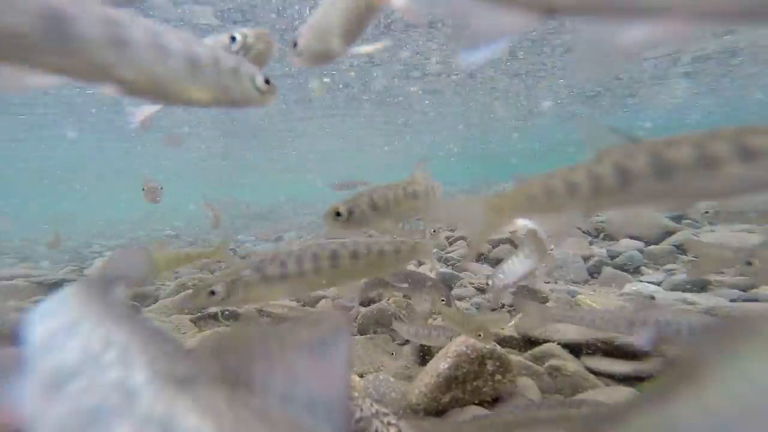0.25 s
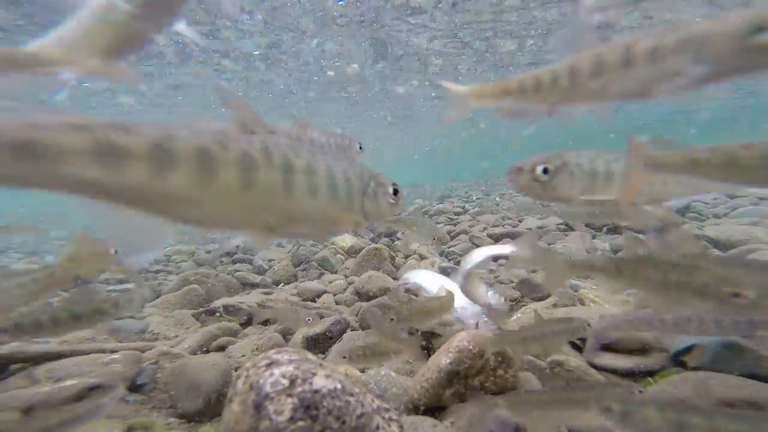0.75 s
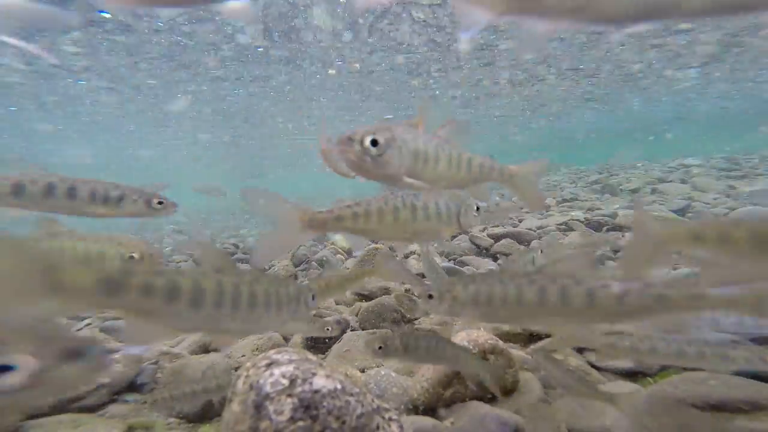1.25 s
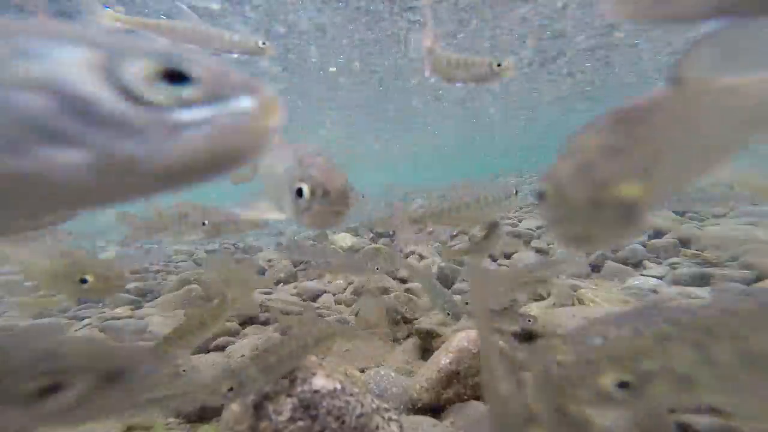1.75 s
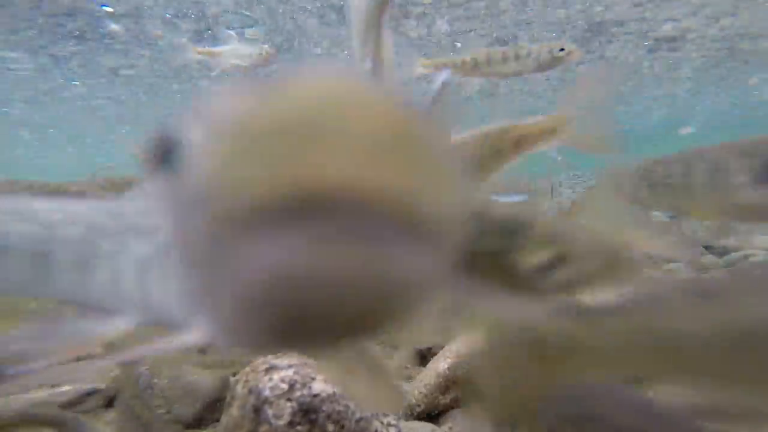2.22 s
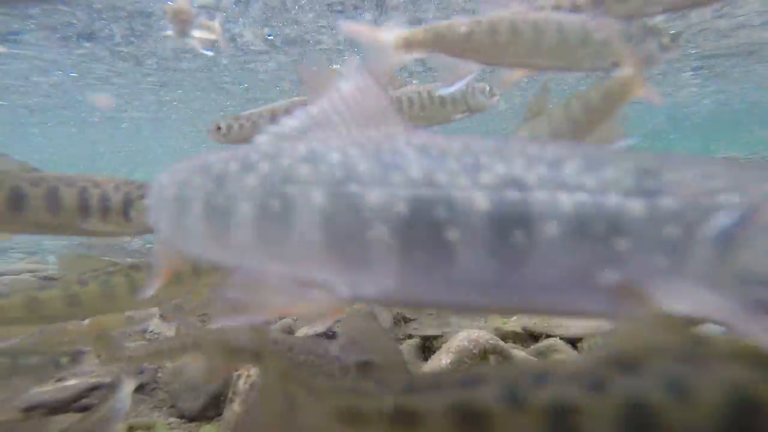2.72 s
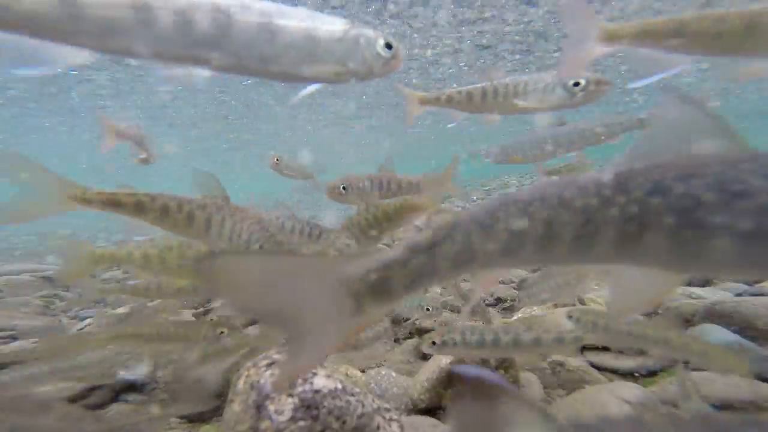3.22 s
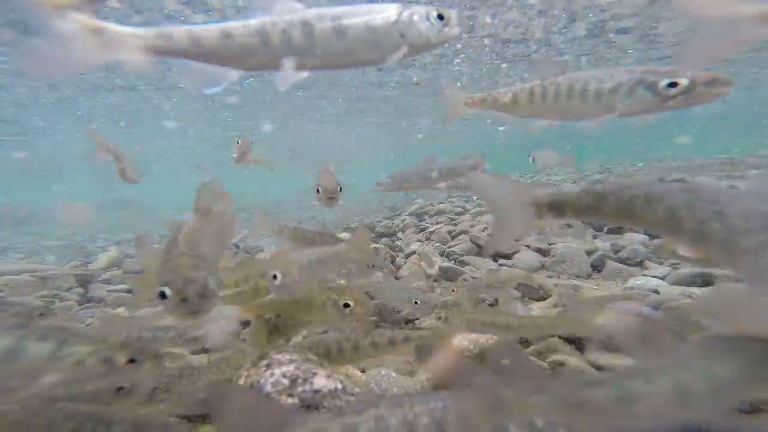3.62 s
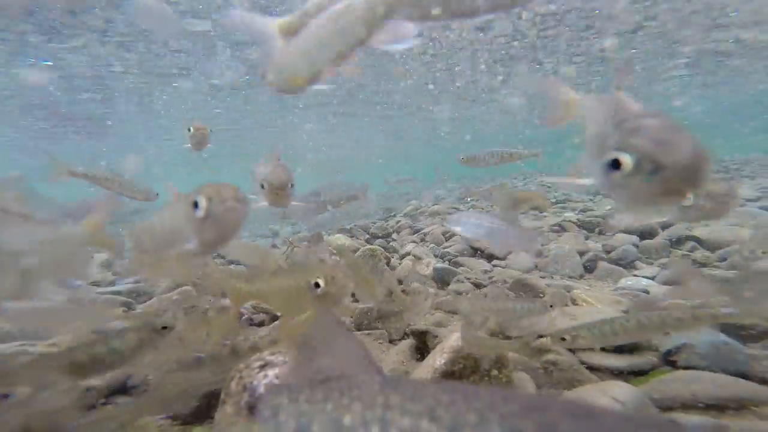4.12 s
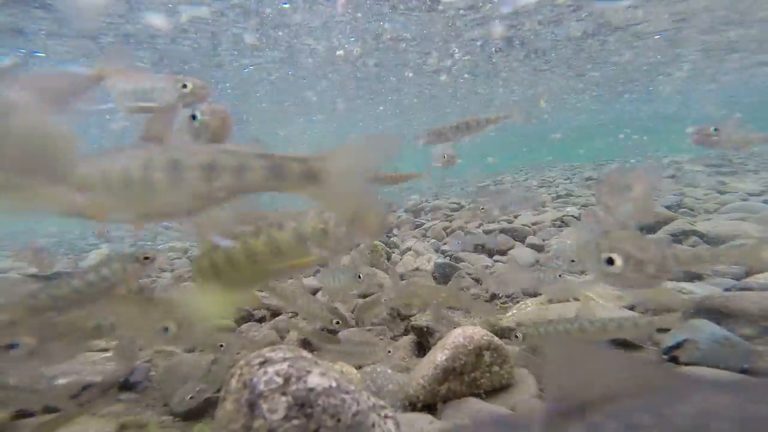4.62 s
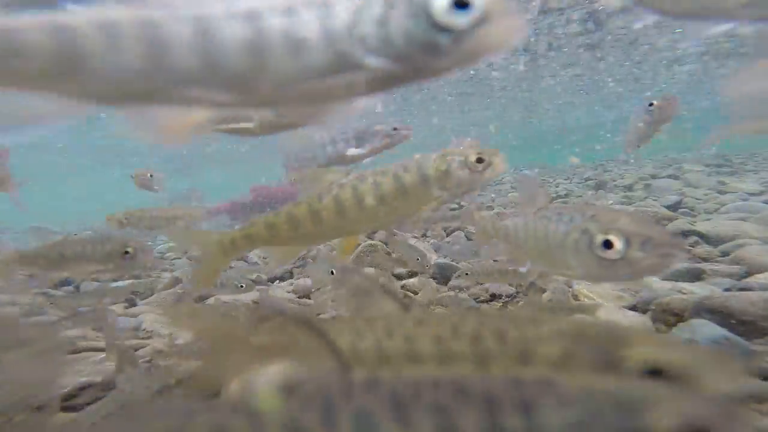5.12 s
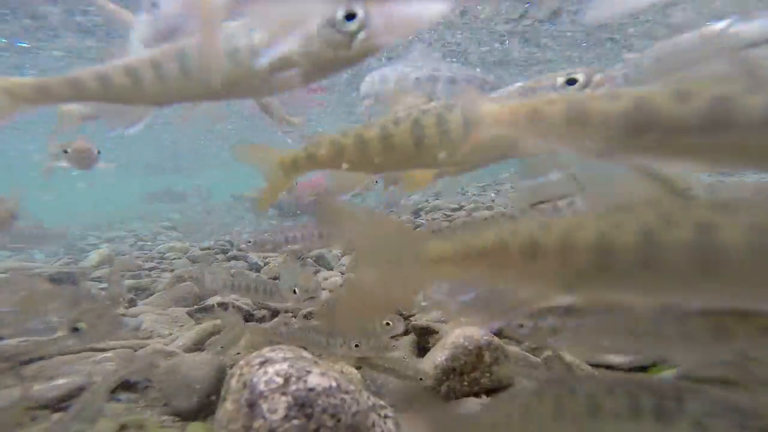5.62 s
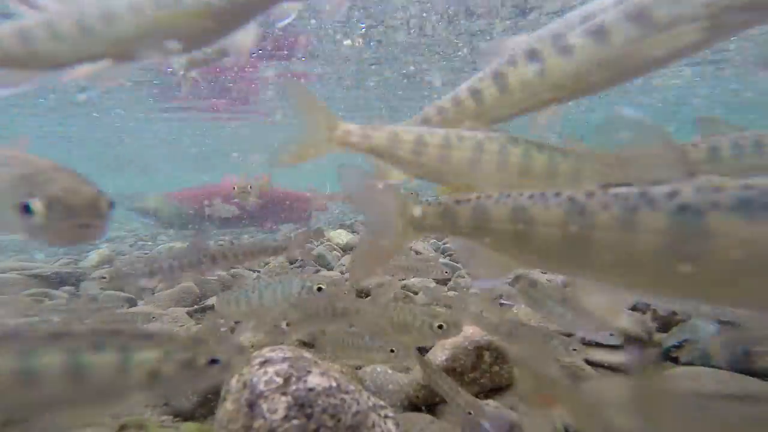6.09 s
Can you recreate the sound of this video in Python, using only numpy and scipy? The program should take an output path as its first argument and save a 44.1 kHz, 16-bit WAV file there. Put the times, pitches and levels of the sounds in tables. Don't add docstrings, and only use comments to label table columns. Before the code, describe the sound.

Underwater on a gravel river bed, fish thump and scrape a sealed camera housing in abrupt clusters, with faint hiss and electronic ticks between.

```python
import sys
import numpy as np
from scipy import signal
from scipy.fft import rfft, irfft
from scipy.io import wavfile
from scipy.ndimage import uniform_filter1d

SR = 44100
rng = np.random.default_rng(int(sys.argv[2]) if len(sys.argv) > 2 else 0)


def wav_record(signal):
    frames = np.transpose(np.atleast_2d(signal))
    bounded = np.clip(frames, -1, 1)
    quanta = np.round(bounded * 32767).astype(np.int16)
    wavfile.write(sys.argv[1], SR, quanta)


def decibels_to_gain(level_db):
    exponent = np.asarray(level_db, float) / 20
    return 10 ** exponent


N = 280026

# pitch_hz, width_hz, level_db
SHELL_DULL = [(501, 260, -3.5), (807, 190, 1)]
SHELL_DEEP = [(1030, 320, -3), (1237, 220, 4), (1630, 260, -1.5)]
SHELL_MID = [(1944, 256, 4.5), (2480, 164.5, -2.5), (3120, 1140, 4.5)]


def add(out, s, wave):
    i = int(s * SR)
    out[i:i + len(wave)] += wave[:N - i]


def coloured(points):
    hz, db = np.transpose(points)
    f = np.arange(N // 2 + 1) * SR / N + 1
    gain = decibels_to_gain(np.interp(np.log(f), np.log(hz), db))
    y = irfft(rfft(rng.standard_normal(N)) * gain, N)
    return y / np.std(y)


def panels(modes, spot=0):
    t = np.arange(1024) / SR * 2 ** (np.clip(spot, -6, 6) / 12)
    ring = np.zeros(1024)
    for k, (hz, width, db) in enumerate(modes):
        decay = np.exp(-np.pi * width * t)
        soft_start = 1 - np.exp(-t * hz * 1.86)
        ring += (-1) ** k * decibels_to_gain(db) * np.sqrt(width) * decay * np.sin(2 * np.pi * hz * t) * soft_start
    return ring / np.sqrt(np.sum(ring ** 2))


def rings(x, modes, spot=0):
    return signal.fftconvolve(x, panels(modes, spot))[:N]


def thump(hz, cycles, rise=0.15):
    cycles = max(cycles, .15)
    c = np.arange(int(min(7 * cycles / hz, .6) * SR)) / SR * hz
    turns = c + .25 * (1 - np.exp(-2 * c))
    swing = -np.sin(2 * np.pi * turns) * np.exp(-c / cycles) * (1 - np.exp(-c / rise))
    swing *= np.minimum(3 * (1 - c / c[-1]), 1)
    return swing / np.abs(swing).max()


def rock():
    return thump(35 * (1 + 0.11 * rng.uniform(-0.79, 1)), 2.4, rise=0.85)


def hiss():
    # pitch_hz, level_db
    hiss_colour = [(20, -7), (60, -5), (200, -7.5), (500, -11), (1200, -16), (4000, -23.5), (9400, -33),
                   (14700, -40.5)]
    return decibels_to_gain(-58) * coloured(hiss_colour)


def whines():
    # pitch_hz, level_db
    whine_tones = [(2930, -81), (5845, -77.5), (8781, -83), (11718, -83), (14625, -82)]
    time = np.arange(N) / SR
    out = np.zeros(N)
    for hz, db in whine_tones:
        drift = np.cumsum(rng.standard_normal(N)) * .009
        out += decibels_to_gain(db + 3.5) * np.sin(2 * np.pi * hz * time + drift)
    return out


def memory_card():
    # start_s, end_s, level_db
    long_writes = [
        (0, 0.228, -68),
        (1.966, 2.25, -69),
        (4.201, 4.506, -68.5),
        (4.547, 4.641, -75),
    ]
    # start_s, blocks
    short_writes = [(.5893, 1), (.6826, 1), (.7235, 1), (.8212, 1), (1.0821, 1), (1.2338, 2), (1.372, 1),
                    (1.5551, 1), (1.814, 2), (1.9437, 1), (2.8856, 1), (3.0019, 1), (3.2488, 2),
                    (3.4035, 1), (3.4269, 2), (3.5322, 2), (3.6604, 1), (3.7527, 2), (4.6059, 1),
                    (4.6812, 1), (4.8944, 1), (5.0035, 2), (5.187, 1), (5.3044, 2), (5.4943, 1), (5.662, 1),
                    (5.7842, 1), (5.9069, 1), (5.9314, 1), (6.28, 2)]
    # start_s, end_s, level_db
    closing_buzz = [
        (.232, 0.277, -67),
        (4.51, 4.558, -67),
    ]
    # pitch_hz, width_hz, level_db
    card_colour = [(6860, 520, 7.5), (10240, 430, 5.5), (13000, 1200, 0)]
    time = np.arange(N) / SR
    draw, buzz = np.zeros((2, N))
    frame_s, pulse_s, block_gap_s, buzz_hz = .0333, .0055, .0125, 798
    in_frame = time % frame_s
    blocks = (in_frame % pulse_s < .003) * (in_frame < .026)
    for start, end, db in long_writes:
        draw += decibels_to_gain(db) * blocks * (time > start) * (time < end)
    for s, count in short_writes:
        for k in range(count):
            add(draw, s + k * block_gap_s, np.full(int(0.0025 * SR), decibels_to_gain(-66.5)))
    spikes = np.diff(np.floor(time * buzz_hz), append=0) > 0
    for start, end, db in closing_buzz:
        buzz += decibels_to_gain(db) * np.sqrt(SR / buzz_hz) * spikes * (time > start) * (time < end)
    crackle = draw * np.sign(rng.standard_normal(N))
    return rings(crackle + buzz, card_colour)


def circuit():
    top = signal.ellip(10, .3, 45, 14950, fs=SR, output="sos")
    return signal.sosfilt(top, hiss() + whines() + memory_card())


def current():
    # time_s, level_db
    flow = [(0, -84), (.17, -50), (.32, -43), (.55, -43.5), (.7, -64), (.83, -56), (.97, -80), (1.3, -57.5),
            (1.66, -81), (2.16, -54), (2.4, -51), (2.71, -44.5), (2.87, -70), (3.55, -78.5), (4.15, -53.5),
            (4.36, -48.5), (4.701, -71), (6.35, -63)]
    s, db = np.transpose(flow)
    push = decibels_to_gain(np.interp(np.arange(N) / SR, s, db - 2.0))
    return push * coloured([(15, -27.5), (30, 1.5), (60, -5.5), (150, -21.0), (400, -65.0)])


def shoves():
    # start_s, level_db, pitch_hz, rocking against the shove in db
    shove_table = [ (.143, -44, 63, 2.5), (.364, -23, 58.3, -25.5), (.422, -32.5, 69, -26),
                   (.571, -43, 60, -6), (1.383, -32, 57.5, -13), (1.4008, -35.5, 57.6, -12),
                   (2.135, -36, 66, -14), (2.2789, -12.5, 94, -27), (2.348, -23, 75.5, -34),
                   (2.425, -25.5, 65, -35), (2.493, -35.5, 55.9, -13), (2.765, -44, 45.2, -19),
                   (3.774, -42.5, 67, -13.5), (4.048, -14.5, 53.7, -22.5), (4.095, -26, 70.4, -30),
                   (4.178, -25.5, 55, -17), (4.215, -33, 53.7, -5), (4.235, -40, 69, -4),
                   (4.343, -40, 45, 2), (.165, -32, 46, -13.5), (.535, -34, 46, -5.5),
                   (2.733, -40, 70, -13)]
    out = np.zeros(N)
    for s, db, hz, rock_db in shove_table:
        add(out, s, decibels_to_gain(db) * thump(hz, 0.55))
        add(out, s, decibels_to_gain(db + rock_db) * rock())
    return out


def bounces():
    # start_s, level_db, pitch_hz, decay in cycles
    bounce_table = [(.143, -35.5, 280, 0.2), (.528, -27, 190, 0.46), (0.533, -29, 159, 0.25),
                    (1.383, -31, 90, .22), (1.3885, -33, 84.6, .45), (1.9782, -24.5, 255, 0.27),
                    (0.3098, -17, 210, .22), (2.269, -16.5, 210, 0.22), (2.7275, -42, 120, 0.24),
                    (2.4925, -36, 119, .4), (4.628, -49.5, 45, .6), (2.2926, -21, 200, 0.43),
                    (2.755, -42, 90, .3), (4.044, -15, 115, 0.25), (4.069, -12, 70, 0.19),
                    (4.296, -30, 80.7, .22)]
    out = np.zeros(N)
    for s, db, hz, cycles in bounce_table:
        add(out, s, decibels_to_gain(db) * thump(hz, cycles))
    return out


def strokes():
    # contact_s, hold_s, level_db, brightness_db, sand against the rub in db
    stroke_table = [(0.317, 0.0056, -39, 5, -8), (0.327, 0.021, -39.5, -6, -21),
                    (0.35, 0.01, -38.5, -3, -18), (.376, 0.035, -44.5, -6, -17), (0.42, 0.045, -50, 0, -11),
                    (0.464, 0.016, -39.5, -3, -10), (0.492, 0.046, -49, -2.5, -9.5),
                    (1.382, 0.0043, -48, -8, -19), (1.981, 0.011, -57, -2, -8),
                    (2.277, 0.0038, -31.5, -11, -14), (2.294, 0.016, -32, -4.5, -17.5),
                    (2.325, 0.021, -39.5, -6.5, -20), (2.383, 0.04, -54.5, -5, -24),
                    (2.425, 0.061, -51.5, -2.5, -17), (2.505, 0.042, -58.5, -6, -24),
                    (2.628, 0.0064, -52.5, 2, -15), (2.676, 0.044, -52.5, -2, -12),
                    (2.724, 0.013, -41.5, -2, -10.5), (4.017, 0.013, -34, -3, -10.5),
                    (4.035, 0.013, -28.5, -7.5, -17.5), (4.052, 0.019, -29, -8.5, -15.5),
                    (4.086, 0.064, -50.5, -6, -22), (4.165, 0.043, -45.5, -5.5, -22),
                    (4.205, 0.071, -42, -5, -13.5), (4.302, 0.014, -40, 1.5, -8.5),
                    (4.312, 0.013, -44.5, -6, -11)]
    s, hold, db, bright_db, sand_db = np.transpose(stroke_table)
    t = np.arange(0, N / SR + 1, .001)[:, None] - s
    press_db_per_s, lift_db_per_s = 1793.5, 903
    press = db + press_db_per_s * np.minimum(t, 0) - lift_db_per_s * np.maximum(t - hold, 0)
    k = press.argmax(axis=1)
    top = np.maximum(press.max(axis=1), -120)
    ms = np.arange(N) / SR * 1000
    return [np.interp(ms, np.arange(len(k)), v) for v in (top, bright_db[k], top + sand_db[k])]


def grit(per_s, spread_db):
    size = decibels_to_gain(spread_db * np.minimum(rng.exponential(size=N), 4))
    grains = rng.standard_normal(N) * (rng.random(N) < per_s / SR) * size
    return grains / np.std(grains)


def loose_stones(rub_db, bright_db):
    when, size, edge, soft = rng.random((2000, 4)).T
    per_s = 40
    s = np.cumsum((.3 - np.log(when)) / per_s / 1.3)
    i = np.minimum(s * SR, N - 1).astype(int)
    db = rub_db[i] - 7.5 + 12 * (size - .5)
    edge_db = -22 + 14 * (edge - .5)
    spot = 4.5 * (when - .5)
    stones = np.c_[s, db, bright_db[i] - 3, edge_db, spot, .6 * soft]
    return stones[(s < N / SR) & (rub_db[i] > -70)]


def contacts(rub_db, bright_db):
    # start_s, level_db, brightness_db, edge_db, spot in semitones
    nudge_table = [
        (.1427, -37.5, -30, -44, -0.5),
        (.2527, -40, -23, -40, 1.6),
        (.2862, -38, -20, -36, .3),
        (0.3003, -39, -26, -44, -1.5),
    ]
    tap_table = [(.3136, -23, -9, -25.5, .6), (0.3382, -31, -4, -5, -0.48), (.3445, -24, -3.5, -26, 0.42),
                 (1.9792, -27.5, -8.5, -13, -0.98), (2.2695, -13.5, -15, -40, -.6),
                 (2.2785, -26, -14, -23, 1.1), (2.2997, -19.5, -12, -15, .6), (2.3193, -48, -.5, -30, .6),
                 (4.02, -17.5, -11.5, -14, -1.3), (4.03, -18, -16, -27, -.6), (4.0443, -25, -11, -10, 0.33),
                 (4.0574, -3, -22, -40, -.6), (4.0976, -37.5, 2, -12, .6), (4.174, -36.5, 0, -6, -0.33),
                 (4.2077, -30, -25, -29, 0.98), (4.2137, -28, -19, -17, -0.45),
                 (4.231, -29, -10, -14, 0.46), (4.274, -35, 1.5, -8, -0.15), (4.3065, -36, -8, -22, 0.73),
                 (4.0532, -13.5, -21, -32, 1.1), (4.0618, -16, -24, -30, .6), (2.2658, -38, -13, -35, .6)]
    tick_table = [(0.3115, -22, -21, -31, 0.36), (0.3198, -18, -1.6, -16, 0.34), (0.364, -27, -3, -19, .6),
                  (0.4038, -19, -1, -17.5, 1.2), (0.421, -28, -9, -17, -.6), (.4385, -37, 4, -17, 1.7),
                  (0.449, -26.5, -0.5, -14, 1.5), (0.4599, -30, -2, -29, 0.73),
                  (0.4676, -10.5, -1.7, -15, 0.56), (0.4786, -30, -2, -25, 0.46),
                  (.483, -30, -2, -6.5, 0.78), (0.511, -32.5, -11, -12, 0.81),
                  (0.5276, -25.5, -1.5, -14, 0.99), (1.3737, -36, -11, -31, 1), (1.3818, -28, -8, -12, 1.5),
                  (1.385, -30, -21, -42, -1), (1.403, -34.5, -6.5, -15, .6), (2.3485, -34, -8, -2.5, .6),
                  (2.365, -34, -8, -11, .6), (2.4453, -40, -3, -4, 0.87), (2.4616, -26.5, -8, -20, -0.92),
                  (2.471, -27.5, -9, -17.5, 0.42), (2.5191, -32.5, -6, -17, -0.24),
                  (2.5437, -38, -4, -22, 0.4), (2.627, -34, -8, -17, 1.2), (2.632, -32, -12, -14.5, 0.11),
                  (2.679, -37, -8, -27, .6), (2.6855, -39, -2, -16, 0.79), (0.3886, -38, -1.2, -22, 0.83),
                  (.397, -33, -1.5, -16, .6), (.4525, -31, -10, -26, .6), (0.4987, -29.5, -4, -21, 1.7),
                  (0.5237, -36, 0, -4, .6), (0.3227, -28, -2, -18, 0.89), (.26, -46.5, -.5, -30, 0.46)]
    more_tick_table = [(4.0079, -22.5, -14.5, -37, -1.5), (4.071, -27, -7, -4.5, .6), (4.11, -42, -4, -6, .6),
                       (4.1427, -31, -16, -25, -0.47), (4.1495, -31.5, -4, -17, 0.77),
                       (4.1833, -25, -9.5, -14.5, 0.75), (4.219, -30, -9, -16, 0.46),
                       (4.2395, -26, -21, -22, 1.4), (4.2513, -27, -13, -17, .6), (4.2625, -32, -19, -24, 0.47),
                       (4.3144, -26.5, -7, -17, 0.41), (4.2985, -42, -1, -17, 0.47), (4.3115, -29, -3, -7, 0.76),
                       (4.268, -33, -2, -6, 1), (2.2925, -31, -10.5, -15, 1.2), (2.3035, -31.5, 1, -6, 0.26),
                       (2.3095, -29, -9, -18, 1.2), (2.3527, -47, 5, 4, 0.44), (2.274, -23.5, -15, -18, 0.73),
                       (4.0405, -21, -4, -19, .6), (4.0595, -14, -16, -31.5, 0.34), (2.2965, -28, -9, -12, 0.61),
                       (4.1765, -34, -16, -25, -1.5), (4.3165, -27, -19, -28, 0.49), (.4712, -28, -3, -18, .6),
                       (.418, -34, 0, -24, .6), (2.4535, -42, -3, -13, .6), (2.477, -37, -10, -16, 0.72),
                       (2.4105, -46, 0, -14, .6), (2.433, -46, -5, -7, .6), (2.7145, -42, -1, -20, .6),
                       (2.7285, -32, -6, -12, 0.3), (2.734, -33.5, -4, -15, 1.5), (2.739, -32, -10, -18, -0.76),
                       (2.281, -33, -8.5, -3.5, .6), (1.3765, -42, -14, -30, .6), (1.3985, -42, -14, -30, 1.5),
                       (.4125, -36, -3, -18, .6), (.531, -34, -6, -16, .6), (2.4815, -39, -6, -22, 1.5)]
    touches = [(*r, 1) for r in nudge_table]
    touches += [(*r, 0.8) for r in tap_table]
    touches += [(*r, 0.17) for r in tick_table + more_tick_table]
    return touches + list(loose_stones(rub_db, bright_db))


def knocks(rub_db, bright_db):
    struck, crumbs = np.zeros((2, N))
    t = np.arange(400) / SR
    fade = np.exp(-t / 0.0026) * (1 - np.exp(-t * 10000))
    for s, db, bright, edge_db, spot, soft in contacts(rub_db, bright_db):
        crumble = rng.standard_normal(400) * fade
        burst = crumble.copy()
        burst[3] += 14
        burst = decibels_to_gain(db) * 5.4 * burst / np.sqrt(np.sum(burst ** 2))
        low = burst * np.sqrt(max(1 - decibels_to_gain(min(bright, 0)) ** 2, .05))
        soft = np.clip(soft, 0, 1)
        add(struck, s - .001, rings(low * np.sqrt(soft), SHELL_DULL, spot))
        add(struck, s - .001, rings(low * np.sqrt(1 - soft), SHELL_DEEP, spot))
        add(struck, s - .0007, rings(burst * decibels_to_gain(bright), SHELL_MID, spot))
        add(crumbs, s - .0009, crumble * decibels_to_gain(db + edge_db - 5.5))
    return struck, crumbs


def shell():
    # pitch_hz, width_hz, level_db
    high_panels = [(4410, 770, 8.5), (5730, 680, 6), (7100, 680, 2), (8400, 1140, -3), (10300, 620, -1.5),
                   (13690, 1600, -11.5)]
    # pitch_hz, width_hz, level_db
    sand_ring = [(6750, 500, -1.5), (10160, 600, 2.5)]
    rub_db, bright_db, sand_db = strokes()
    struck, crumbs = knocks(rub_db, bright_db)
    rub = decibels_to_gain(rub_db) * grit(5000., 2.7)
    sand = decibels_to_gain(sand_db - 5.0) * grit(8800.0, 3.9)
    rumble = decibels_to_gain(0.5) * rings(rub, [(150, 62, 3.0), (330, 96, -5.5)])
    body = struck + rings(decibels_to_gain(-2.0) * rub, SHELL_DULL) + rings(decibels_to_gain(-1.5) * rub, SHELL_DEEP)
    body += rings(decibels_to_gain(bright_db) * rub, SHELL_MID)
    body = signal.sosfilt(signal.cheby1(6, 1, 3650, fs=SR, output="sos"), body)
    edge = rings(crumbs + sand, high_panels) + decibels_to_gain(-7) * rings(sand, sand_ring)
    edge = signal.sosfilt(signal.cheby1(4, 1, 15000, fs=SR, output="sos"), edge)
    return rumble + body + edge


def recoils():
    # start_s, level_db, pitch_hz, decay in cycles
    recoil_table = [(0.3154, -4, 64.7, .17), (1.3766, -19, 189, 0.2), (2.273, -4.5, 60.2, 0.13),
                    (4.0207, -0.7, 252, 0.26), (4.3049, -13, 260, 0.3), (0.155, -34, 45, 0.2),
                    (0.2036, -30, 374, 0.5), (0.291, -23, 80, 0.68), (.3397, -12.5, 164, 0.25),
                    (0.5234, -23.5, 229, 0.35), (2.7485, -34, 45, 0.28), (4.074, -23, 35, 0.21),
                    (2.661, -44, 200, .3), (1.9832, -17, 122, 0.13), (2.0033, -27.5, 200, .22),
                    (2.7236, -27, 250, 0.43), (2.7307, -29, 150, 0.2), (4.0113, -3.5, 80.6, 0.63),
                    (4.022, -8.5, 230, .22), (4.0642, -13.5, 139, 0.29), (4.2712, -30, 60, .22),
                    (4.322, -24, 40, 0.39), (4.326, -31.5, 300, 1.5)]
    out = np.zeros(N)
    for s, db, hz, cycles in recoil_table:
        add(out, s, -decibels_to_gain(db) * thump(hz, cycles))
    return out


def blows():
    # start_s, level_db, pitch_hz, decay in cycles
    blow_table = [ (0.2048, -31.5, 110, 0.24), (.251, -28.5, 120, 0.63), (0.285, -17.5, 126, 0.21),
                  (0.3122, 0.5, 122, 0.29), (0.3374, -8.5, 150, 0.38), (.403, -39, 150, 1.6),
                  (0.466, -31, 328, 0.56), (0.5253, -21.5, 125, 0.24), (1.38, -27.5, 182, 0.31),
                  (1.981, -10.5, 185, 0.15), (1.988, -26.5, 282, 1.2), (2.001, -30, 190, 0.27),
                  (2.014, -28, 108, 0.42), (2.028, -31, 131, 0.21), (2.128, -39.5, 190, 1.06),
                  (2.2709, 1.5, 138, 0.2), (2.289, -25, 150, .6), (2.304, -25, 393, 2.1),
                  (2.4809, -33, 160, 2.1), (2.7251, -22.5, 115, 0.29), (4.0093, -0.5, 135, 0.14),
                  (4.0239, -6, 190, .2), (4.0271, -17, 230, .6), (4.056, -16, 390, 0.75),
                  (4.067, -15.5, 150, 0.22), (4.2674, -20.5, 90, 0.24), (4.3064, -17.5, 114, 0.61),
                  (4.3167, -13.5, 227, 0.53), (4.3212, -16, 199, 0.17)]
    out = np.zeros(N)
    for s, db, hz, cycles in blow_table:
        add(out, s, decibels_to_gain(db) * thump(hz, cycles))
        add(out, s, decibels_to_gain(min(db - 30, -44)) * rock())
        if db > -5 and hz < 200:
            add(out, s - 0.0019, decibels_to_gain(db - 12) * thump(110., .3))
    return out


def pebbles():
    # start_s, level_db, pitch_hz
    chip_table = [(0.359, -34, 2000), (0.3964, -42, 3270), (0.3969, -40, 1420), (0.4039, -28, 1340),
                  (0.4089, -39, 1380), (0.4168, -40, 2280), (0.4612, -40, 3140), (0.4612, -36, 2090),
                  (0.4772, -37, 1300), (0.4777, -37, 3360), (0.4827, -34, 2540), (2.2163, -43, 470),
                  (2.2791, -27, 1553), (2.2921, -30, 1420), (2.2971, -28, 1770), (2.3305, -33, 860),
                  (2.4447, -42, 3320), (2.4447, -44, 1460), (2.4602, -42, 3140), (2.4752, -42, 1340),
                  (2.4792, -45, 2020), (2.5246, -47, 1380), (2.542, -46, 1290), (2.7266, -42, 3140),
                  (2.7286, -37, 1550), (2.7326, -36, 1430), (4.0207, -30, 1980), (4.0321, -29, 1510),
                  (4.0381, -21, 727), (4.0426, -25, 1510), (4.0516, -21, 690), (4.0695, -26.5, 1610),
                  (4.074, -26.5, 470), (4.1748, -39, 1510), (4.2032, -39, 730), (4.2132, -39, 1890),
                  (4.2202, -35, 1160), (4.2546, -35, 860), (4.2711, -37, 1510), (4.312, -35, 3140)]
    # start_s, level_db, pitch_hz
    more_chip_table = [
        (1.3809, -23, 1600),
        (1.3846, -25, 1170),
        (4.2138, -30, 800),
        (2.461, -40, 560),
        (.4492, -35, 2550),
    ]
    out, t = np.zeros(N), np.arange(500) / SR
    swell_s = .0011
    for s, db, hz in list(chip_table) + list(more_chip_table):
        add(out, s, decibels_to_gain(db) * np.sin(2 * np.pi * hz * t) * t / swell_s * np.exp(1 - t / swell_s))
    return out


def bubbles():
    # start_s, level_db, pitch_hz
    bubble_table = [
        (0.807, -43.5, 456),
        (0.923, -44, 391),
        (1.491, -53.5, 490),
        (1.592, -46, 464),
        (2.791, -45, 496),
    ]
    out = np.zeros(N)
    for s, db, hz in bubble_table:
        add(out, s, decibels_to_gain(db) * thump(hz, 1.6, rise=0.76))
    return out


def lens_rattle():
    # start_s, length_s, level_db
    rattle = (4.0183, 0.00335, -18.5)
    s, length, db = rattle
    band = signal.butter(1, [8000., 14000.], "band", fs=SR)
    chatter = signal.lfilter(*band, rng.standard_normal(600))[:int(length * SR)]
    out = np.zeros(N)
    add(out, s, decibels_to_gain(db) * chatter * np.hanning(len(chatter)) ** .5 / 2)
    return out


def sand_grain():
    # (pitch_hz, width_hz, level_db)
    ping = (4.4092, -49, [(5900, 350, 3), (7700, 500, -3), (10000, 900, -8)])
    s, db, tones = ping
    knock = np.zeros(N)
    add(knock, s, decibels_to_gain(db) * 10 * np.ones(1))
    return rings(knock, tones)


def scene():
    housing = shoves() + bounces() + recoils() + blows() + bubbles()
    surface = shell() + pebbles() + lens_rattle() + sand_grain()
    return (circuit() + current() + housing + surface)[None]


def dull_moments(x):
    # start_s, end_s
    dull_table = [(.139, .155), (.291, .307), (.933, .945), (1.06, 1.074), (1.356, 1.368), (1.386, 1.396),
                  (1.975, 1.985), (2.254, 2.267), (2.441, 2.467), (2.487, 2.521), (2.614, 2.642),
                  (4.001, 4.007)]
    gate = np.zeros(N)
    for start, end in dull_table:
        add(gate, start, np.ones(int((end - start) * SR)))
    top = signal.sosfiltfilt(signal.butter(10, 12300, "high", fs=SR, output="sos"), x)
    return x - .8 * uniform_filter1d(gate, 130) * top


def roll_off(x):
    return signal.sosfilt(signal.butter(12, 15200, fs=SR, output="sos"), x)


def record(dry):
    top = signal.ellip(10, .3, 45, 15400, fs=SR, output="sos")
    mix = dull_moments(signal.sosfilt(top, np.clip(dry, -1, 1)))
    return roll_off(mix)


dry = scene()
out = record(dry)
wav_record(out)
```